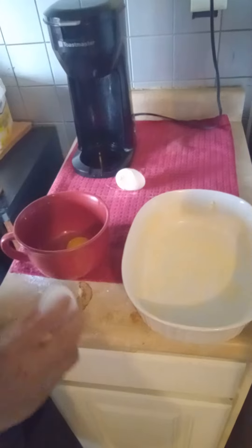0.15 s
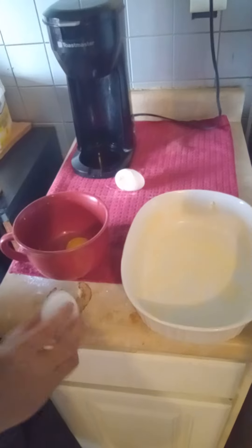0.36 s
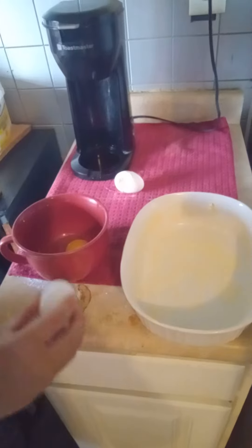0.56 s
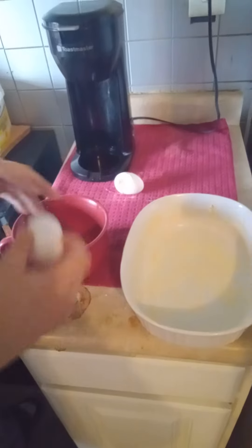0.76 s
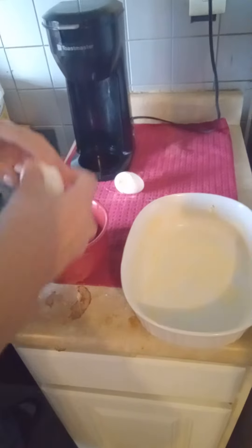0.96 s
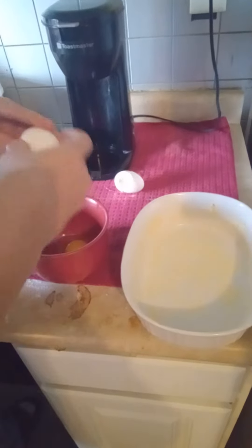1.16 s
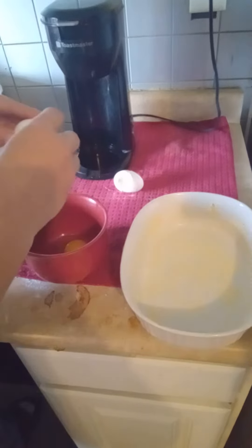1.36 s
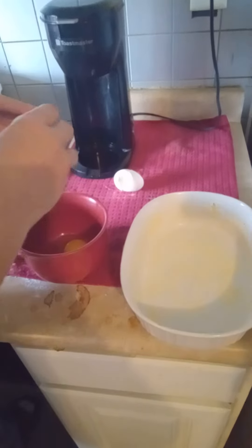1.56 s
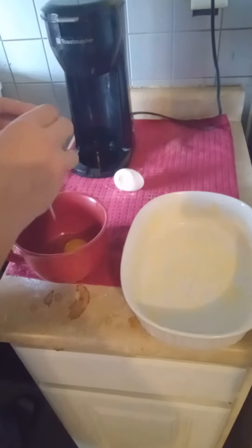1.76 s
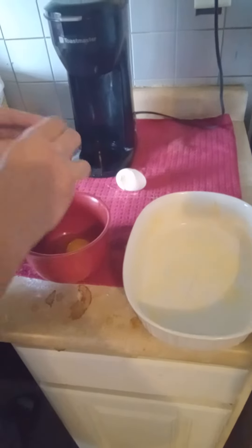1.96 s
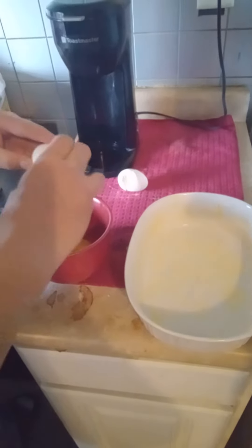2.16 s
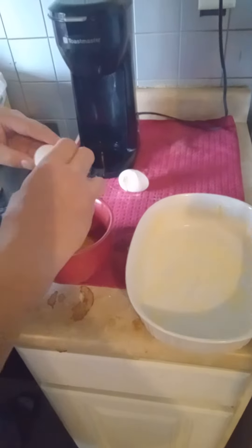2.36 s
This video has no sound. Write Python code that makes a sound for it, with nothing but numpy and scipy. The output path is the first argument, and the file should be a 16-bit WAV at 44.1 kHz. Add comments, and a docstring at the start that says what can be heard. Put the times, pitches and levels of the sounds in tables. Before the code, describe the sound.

An egg cracks against a kitchen counter in two quick knocks, the first boomy and heavier, the second sharper and lighter; then small scuffs, brittle shell ticks, a hollow splitting pop and dull bumps, close in a small tiled room.

```python
"""In a small tiled kitchen an egg is knocked twice on a countertop, then pried open over a cup.
Each knock is a burst of tiny fractures plus the boom of counter panels (decaying noise) and modes
(decaying sines); a fainter contact comes just before the second. Before and after the knocks come
scuffs, ticks and pops (shaped bursts, driven resonances with fizz); later a faint crackle and dull
bumps. The room answers with echoes and a decaying tail, over low rumble and thin hiss."""
import sys
import numpy as np
from scipy import signal
from scipy.fft import rfft, irfft
from scipy.io import wavfile
from scipy.ndimage import uniform_filter1d

SR = 44100
rng = np.random.default_rng(int(sys.argv[2]) if len(sys.argv) > 2 else 0)


def generate_wav(signal):
    """Clip the signal to [-1, 1] and save it as 16-bit WAV at the path in sys.argv[1]."""
    frames = np.transpose(np.atleast_2d(signal))
    scaled = np.clip(frames, -1, 1) * 32767
    pcm = np.round(scaled).astype(np.int16)
    wavfile.write(sys.argv[1], SR, pcm)


N = 110250

# spectrum of skin on shell, also of the wet fizz: frequency_hz, level_db
SCUFF_SPECTRUM = [(150, -30.5), (450, -9.5), (900, 6), (1800, 9), (3500, 4.5), (6000, 3), (8500, 3.5),
                  (11000, -2.5), (16000, -14)]


def amp(db):
    """Amplitude gain: 20 dB for every factor of ten."""
    return 10 ** (np.asarray(db) / 20)


def unit(x):
    """Energy normalisation: the squares sum to one."""
    return x / np.sqrt(np.sum(x ** 2) + 1e-20)


def read(points, hz):
    """Linear interpolation of a table along a logarithmic frequency axis."""
    frequency_hz, value = np.transpose(points)
    return np.interp(np.log(hz + 1), np.log(frequency_hz + 1), value)


def add(mix, start_s, sound):
    """Superposition: adds a sound to the mix from its start time, in place."""
    part = mix[round(start_s * SR):][:len(sound)]
    part += sound[:len(part)]


def colour(x, points, tilt_db=0, size=4096):
    """Minimum-phase filtering: the Hilbert transform of log gain supplies a causal phase."""
    pivot_hz = 6000  # the tilt per octave is zero here and stops a decade lower
    hz = abs(np.fft.fftfreq(size, 1 / SR))
    octaves = np.log2(np.maximum(hz, pivot_hz / 10) / pivot_hz)
    log_gain = np.log(amp(read(points, hz) + tilt_db * octaves))
    response = np.exp(np.conj(signal.hilbert(log_gain)))
    taps = np.fft.ifft(response).real[:size // 2]
    return signal.fftconvolve(x, taps)[:len(x)]


def burst(scale_s, grit_db):
    """Fracture noise: uneven grains swell and die away, whitened to an even spectrum."""
    u = np.arange(SR // 2) / SR / scale_s
    grain_db = grit_db * np.clip(rng.standard_normal(len(u)), -2, 2)
    grains = rng.standard_normal(len(u)) * amp(grain_db)
    envelope = u * np.exp(-2 * u - u ** 2 / 2)
    spectrum = rfft(grains * envelope)
    local_level = np.sqrt(abs(uniform_filter1d(abs(spectrum) ** 2, size=300)) + 1e-20)
    return unit(irfft(spectrum / local_level)[:len(u) // 2])


def chip(x, pitch_hz):
    """Resonance: a piece of shell lifts the band round its own pitch."""
    lift_db, width_octaves = 7, 0.21
    hz = np.geomspace(SR / 400, SR / 2, 200)
    lift = lift_db * np.exp(-(np.log2(hz / pitch_hz) / width_octaves) ** 2)
    return unit(colour(x, np.transpose([hz, lift])))


def knocks():
    """Impact excitation: crushing shell drives the counter's dense panel ring and its modes."""
    # contacts with the counter: start_s, crack_db, crush_time_scale_s, crack_tilt_db_per_octave,
    # thud_db, ring_db, mode_favoured_by_the_spot_hz, ring_swell_time_constant_s
    contacts = [(0.2445, -1.5, 0.0045, -1.57, 1, 5.5, 440.4, 0.0043),
                (0.444, -30.5, 0.0042, 1.5, -44, -38, 346, 0.0043),
                (.4560, -3, 0.004, 4, -4, -5.5, 346, .008)]
    # spectrum of the crushing shell: frequency_hz, level_db
    crack_spectrum = [(200, -9.5), (900, 9), (1800, -2.5), (3600, 1), (4400, -4.5), (5150, 3.5), (6000, -1),
                      (8000, 3.5), (11000, 0), (16000, -6)]
    # dense ring of the counter and the cabinet under it: frequency_hz, level_db
    thud_spectrum = [(30, -27), (60, -8.5), (110, 8.5), (190, 8), (270, 15), (430, 9.5), (720, 14.5),
                     (830, 2), (980, 8), (1300, 4.5), (1700, 0), (3000, -5.5), (8000, -44.5)]
    # strongest modes of the counter: frequency_hz, level_db, t60_s
    counter_modes = [(99.1, -51, 0.53), (139.6, -48, 0.54), (159, -48, 0.88), (251, -38.5, 0.38),
                     (296.2, -40, 0.35), (345, -34.5, 0.35), (357.6, -36, 0.26), (413.7, -35.5, 0.24),
                     (468.7, -34.5, 0.31), (608, -47, 0.3), (640, -43, 0.36), (724, -40, 0.32),
                     (732.7, -43.5, 0.32), (938, -44.5, .27), (1023, -45.5, 0.31), (1051, -48, .28)]
    thud_t60_s, thud_rise_s, counter_lag_s = 0.32, 0.0027, 0.001506
    favour_db, favour_octaves = 7.5, 0.12
    cracks, thuds, ring = np.zeros(N), np.zeros(N), np.zeros(N)
    t = np.arange(SR * 3 // 4) / SR
    panel_envelope = (1 - np.exp(-t / thud_rise_s)) * amp(-60 * t / thud_t60_s)
    for start_s, crack_db, crush_s, tilt_db, thud_db, ring_db, spot_hz, swell_s in contacts:
        crack = colour(burst(crush_s, grit_db=6), crack_spectrum, tilt_db)
        add(cracks, start_s, amp(crack_db) * crack)
        panels = colour(unit(rng.standard_normal(len(t)) * panel_envelope), thud_spectrum)
        modes = np.zeros(len(t))
        for hz, db, t60_s in counter_modes:
            favour = favour_db * np.exp(-(np.log2(hz / spot_hz) / favour_octaves) ** 2)
            tone = np.sin(2 * np.pi * (hz * t + rng.random()))  # random starting phase
            modes += amp(db + favour - 60 * t / t60_s) * tone
        swell = 1 - np.exp(-t / swell_s)
        add(thuds, start_s + counter_lag_s, amp(thud_db) * panels)
        add(ring, start_s + counter_lag_s, amp(ring_db) * swell * modes)
    return cracks, thuds, ring


def ticks():
    """Brittle fracture: resonant snaps over random faint crackle; returns direct and room feeds."""
    # sharp ticks of handled and splitting shell: start_s, level_db, time_scale_s,
    # tilt_db_per_octave, chip_pitch_hz, room_db
    shell_ticks = [(0.0265, -33, 0.0037, -1.5, 9050, -6.5), (0.0355, -29.5, 0.0021, -1.5, 2610, -10),
                   (0.777, -29, .004, 2, 9300, -3.5), (1.0355, -37, 0.002, 4, 13500, -6),
                   (1.0434, -29, 0.0034, -2, 8800, -6), (1.428, -43.5, 0.0037, 5.5, 10340, 0),
                   (1.4503, -39.5, 0.0031, 3, 8700, -3.5), (1.514, -29, 0.0031, 3, 8940, -9),
                   (1.523, -34, 0.0075, -2, 2880, -1.5), (1.6177, -37.5, 0.0045, 6, 8700, -0.5),
                   (1.6767, -31.5, 0.0018, 4, 8650, -12), (1.6935, -30, 0.0022, 4.5, 6800, -12),
                   (1.7558, -25, 0.0016, 6.5, 8450, -9), (1.764, -29, 0.002, 2, 7450, -10),
                   (1.7717, -28.5, .003, 5, 7600, -15), (1.91, -34, 0.0024, -3.5, 9000, -2),
                   (1.9150, -19, 0.003, 4.5, 9700, -9), (1.924, -20.5, 0.0031, -0.5, 10100, -7),
                   (1.9785, -32.5, .005, -3, 7900, -5), (2.3788, -28.5, 0.0031, 11, 10500, -11),
                   (2.386, -33.5, 0.0016, 3, 9260, -9.5), (2.447, -33, 0.0022, 5, 8920, -14),
                   (2.46, -31, 0.0024, 1, 10800, -18)]
    # spectrum of a shell tick: frequency_hz, level_db
    tick_spectrum = [(200, -20), (1000, -5), (3000, -1.5), (6000, -4.5), (8300, 0.5), (10500, -3.5),
                     (16000, -11.5)]
    rattle_s, rattle_db = 0.0105, -3.5  # slower rattle of the shell, within each tick
    crackle_start_s, crackle_end_s, crackle_per_s = 1.38, 1.88, 45
    crackle_db, crackle_spread_db, crackle_room_db = -52, 3, -4
    direct, to_room = np.zeros(N), np.zeros(N)
    for start_s, db, scale_s, tilt_db, pitch_hz, room_db in shell_ticks:
        snap = burst(scale_s, grit_db=4.5)
        snap = snap + amp(rattle_db) * burst(rattle_s, grit_db=7)
        tick = amp(db) * colour(chip(snap, pitch_hz), tick_spectrum, tilt_db)
        add(direct, start_s, tick)
        add(to_room, start_s, amp(room_db) * tick)
    t = np.arange(N) / SR
    within_span = (t > crackle_start_s) * (t < crackle_end_s)
    clicks = (rng.random(N) < crackle_per_s / SR) * within_span
    click_db = crackle_db + crackle_spread_db * rng.standard_normal(N)
    crackle = colour(clicks * amp(click_db), tick_spectrum)
    return direct + crackle, to_room + amp(crackle_room_db) * crackle


def pops():
    """Driven resonance: an uneven push rings a small air pocket; returns direct and room feeds."""
    # hollow pops and taps of the egg in the hands: start_s, pitch_hz, level_db, t60_s, room_db
    pockets = [(0.053, 1400, -45, .012, -10), (0.688, 1080, -39, 0.013, 4), (1.0375, 982, -31, 0.01, -3),
               (1.044, 833, -33, 0.009, -2.5), (1.781, 4850, -38, 0.014, -9), (1.885, 4760, -43, .008, -18),
               (1.894, 3680, -37, 0.0095, -17), (1.9105, 3320, -30.5, 0.0092, -8),
               (1.9158, 3560, -20.5, 0.01, -11.5), (1.9158, 1444, -21, 0.037, -6.5),
               (1.916, 2353, -16.5, 0.058, -10.5), (1.916, 1703, -21.5, 0.023, -10),
               (1.9545, 960, -37, 0.015, -5), (1.9545, 2260, -35, 0.022, -8),
               (1.9705, 1550, -36.5, .025, -10), (1.974, 3570, -37, 0.011, -5.5),
               (1.977, 1070, -35.5, 0.012, -10), (2.3778, 1897, -39.5, 0.033, -16.5),
               (2.4315, 4980, -47, 0.015, -13), (2.442, 3350, -35.5, 0.0068, -5),
               (2.442, 4100, -41.5, .02, -4), (2.442, 1936, -33.5, 0.055, -13),
               (2.4485, 3160, -36, 0.0086, -4)]
    push_s, push_grit = 0.00077, 0.4  # time constant of the push, and its relative unevenness
    fizz_s, fizz_db = 0.0076, -11  # wet crackle with each pop, relative to its ring
    direct, to_room = np.zeros(N), np.zeros(N)
    t = np.arange(SR // 10) / SR
    for start_s, hz, db, t60_s, room_db in pockets:
        push = t * np.exp(-t / push_s) * (1 + push_grit * rng.standard_normal(len(t)))
        envelope = signal.fftconvolve(push, amp(-60 * t / t60_s))[:len(t)]
        ring = unit(envelope * np.sin(2 * np.pi * (hz * t + rng.random())))
        fizz = unit(colour(chip(burst(fizz_s, grit_db=4), hz), SCUFF_SPECTRUM))[:len(t)]
        pop = amp(db) * (ring + amp(fizz_db) * fizz)
        add(direct, start_s, pop)
        add(to_room, start_s, amp(room_db) * pop)
    return direct, to_room


def scuffs():
    """Friction noise: skin drags briefly on the shell."""
    # fingers scuffing and gripping: start_s, level_db, time_scale_s, tilt_db_per_octave
    drags = [(0.045, -40.5, 0.011, -1.5), (0.683, -53.5, 0.017, -10), (0.763, -45, 0.006, 1),
             (0.77, -28, .01, 0), (1.030, -31, 0.016, 0.5), (1.634, -42, 0.015, -3.5),
             (1.864, -37, 0.053, 2), (1.955, -35, 0.0032, -4), (1.9685, -30.5, 0.009, -2.5),
             (2.453, -42, 0.015, 0.5)]
    out = np.zeros(N)
    for start_s, db, scale_s, tilt_db in drags:
        scuff = colour(burst(scale_s, grit_db=4), SCUFF_SPECTRUM, tilt_db)
        add(out, start_s, amp(db) * scuff)
    return out


def bumps():
    """Soft impact: dull pushes of the hands put their energy into low frequencies."""
    # soft bumps of the hands: start_s, level_db, time_scale_s
    pushes = [(0.701, -30.5, 0.023), (1.047, -31.5, 0.04), (1.982, -36, 0.012), (2.108, -24, 0.022),
              (2.256, -26, 0.021)]
    # spectrum of a soft bump: frequency_hz, level_db
    bump_spectrum = [(30, -36), (90, -0.5), (150, -2), (230, 4), (400, -30.5), (1500, -38), (8000, -65),
                     (16000, -65)]
    out = np.zeros(N)
    for start_s, db, scale_s in pushes:
        add(out, start_s, amp(db) * unit(colour(burst(scale_s, grit_db=12), bump_spectrum)))
    return out


def kitchen(x):
    """Reverberation: convolution with hard echoes and a noise tail decaying by frequency."""
    # decay of the room: frequency_hz, t60_s
    room_t60 = [(150, 0.38), (500, 0.31), (1500, 0.32), (4000, 0.38), (8500, 0.31), (15000, 0.22)]
    # colour of the room: frequency_hz, level_db
    room_tone = [(150, 4.5), (1500, -2), (4000, 1), (6000, -2), (8400, -0.9), (10000, -.5), (12000, -1.5),
                 (16000, 0.5)]
    # reflections from counter and walls, before the room's colour: delay_s, gain
    reflections = [(.0046, 0.22), (0.014, 0.17), (.026, .16), (0.029, .18)]
    build_s = 0.004  # time constant of the tail's onset
    noise = rng.standard_normal(SR * 3 // 4)
    hz, t, z = signal.stft(noise, SR, nperseg=256)
    decay = amp(-60 * t / read(room_t60, hz)[:, None])
    tail = signal.istft(z * decay, SR, nperseg=256)[1]
    tail = unit(tail * (1 - np.exp(-np.arange(len(tail)) / SR / build_s)))
    for delay_s, gain in reflections:
        add(tail, delay_s, np.array([gain]))
    return signal.fftconvolve(x, colour(tail, room_tone))[:N]


def scatter(x, count=3):
    """Diffuse reverberation: the sound is shared in rotation among several room tails."""
    turn_hz = 170
    turn = 2 * np.pi * turn_hz * np.arange(N) / SR
    tails = [kitchen(x * np.cos(turn + np.pi * k / count)) for k in range(count)]
    return np.sqrt(2 / count) * sum(tails)


def quiet_kitchen():
    """Stationary noise: low rumble and thin hiss, slightly patchy in time and frequency."""
    # spectrum of the quiet room: frequency_hz, level_db_per_hz (relative)
    floor_spectrum = [(20, -36), (40, -18.5), (65, -3), (100, -1), (160, -2.5), (240, -7), (400, -14.5),
                      (700, -17), (1400, -22), (3100, -25), (5400, -34), (7000, -33.5), (8600, -28),
                      (10500, -36.5), (16000, -39)]
    floor_db, patch_db = -66.5, 1  # RMS level, and standard deviation of the patches
    hz, _, z = signal.stft(rng.standard_normal(N), SR, nperseg=2048)
    patches = uniform_filter1d(rng.standard_normal(z.shape), size=12, axis=0)  # across frequency
    patches = uniform_filter1d(patches, size=5, axis=1)  # across time
    z = z * amp(read(floor_spectrum, hz)[:, None] + patch_db * patches / patches.std())
    noise = signal.istft(z, SR, nperseg=2048)[1][:N]
    return amp(floor_db) * np.sqrt(N) * unit(noise)


def scene():
    """Superposition of direct and reverberant sound at a microphone with a treble peak."""
    # response of the microphone: frequency_hz, level_db
    microphone = [(20, -24), (45, -10.5), (85, -3), (6500, 2), (7500, 3), (8200, 8.5), (8900, 7), (9600, 1),
                  (10400, -1), (16000, -8.5)]
    crack_room_db, thud_room_db, scuff_room_db = -4, -7.5, 0
    cracks, thuds, ring = knocks()
    tick_direct, tick_room = ticks()
    pop_direct, pop_room = pops()
    rubs = scuffs()
    direct = cracks + thuds + ring + tick_direct + pop_direct + rubs + bumps()
    room = scatter(amp(crack_room_db) * cracks + tick_room + pop_room)
    room = room + kitchen(amp(thud_room_db) * thuds + amp(scuff_room_db) * rubs)
    return (colour(direct + room, microphone) + quiet_kitchen())[None]


def record(dry):
    """Band limiting: a linear-phase low-pass filter removes the highest treble."""
    edge_hz = 15950
    taps = signal.firwin(401, edge_hz, window=("kaiser", 8), fs=SR)
    return signal.oaconvolve(dry, taps[None], "same")


dry = scene()
out = record(dry)
generate_wav(out)
```